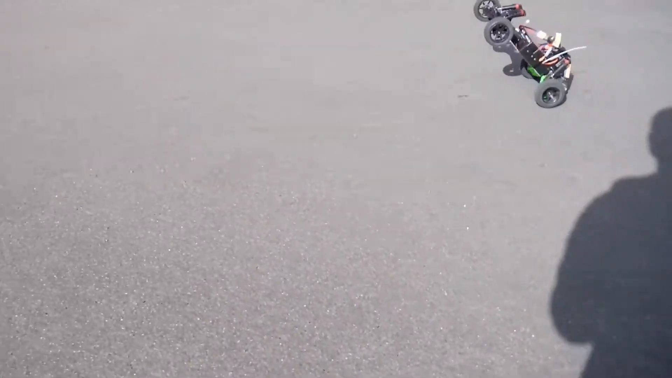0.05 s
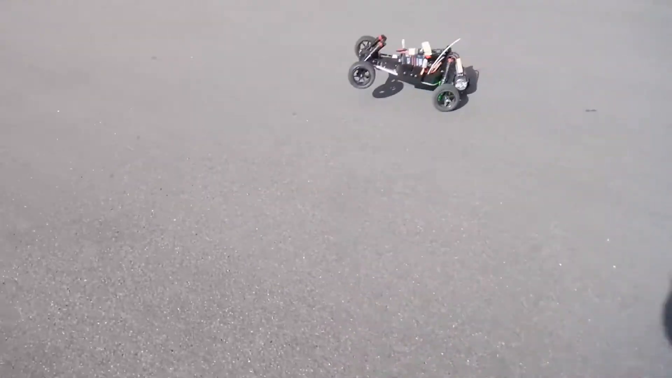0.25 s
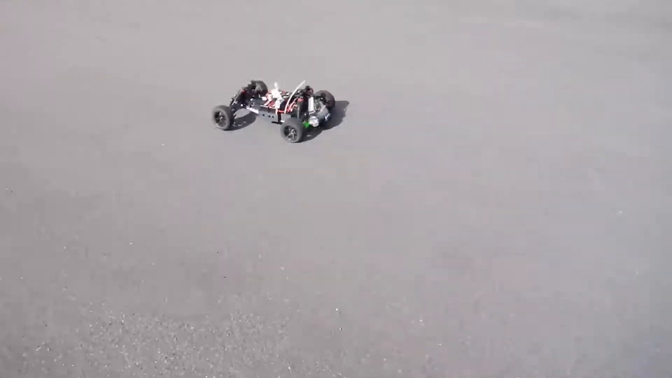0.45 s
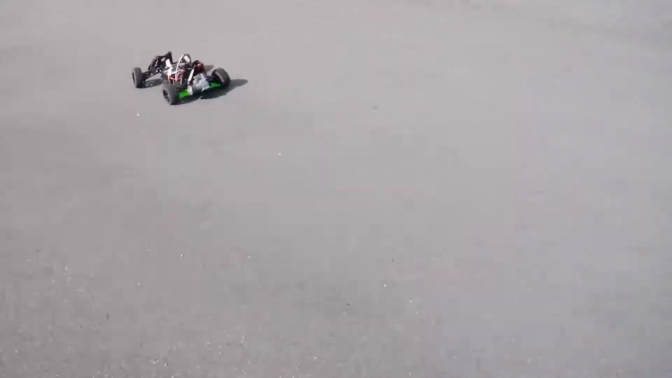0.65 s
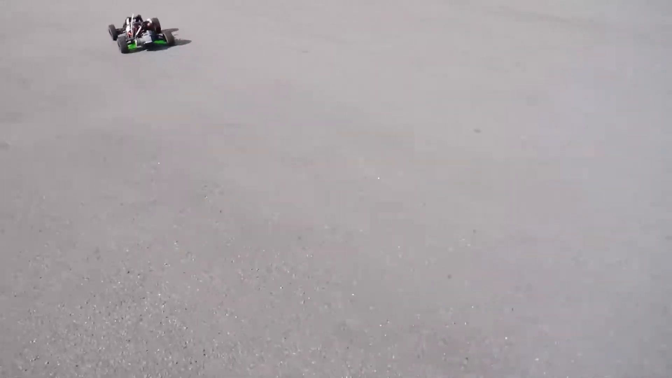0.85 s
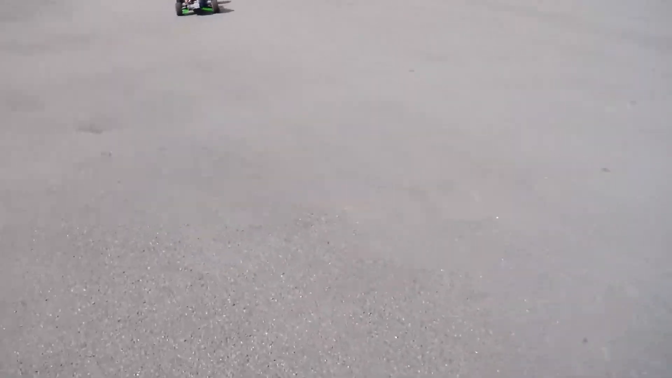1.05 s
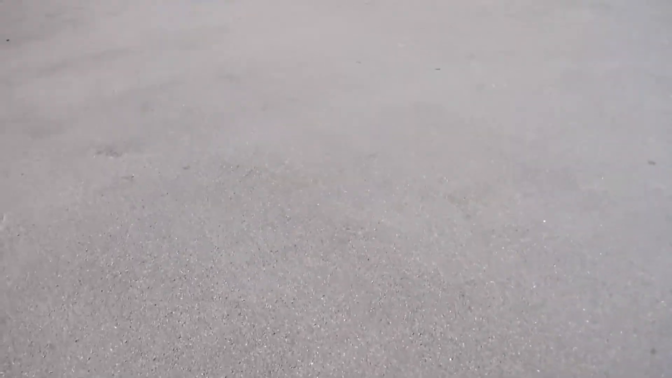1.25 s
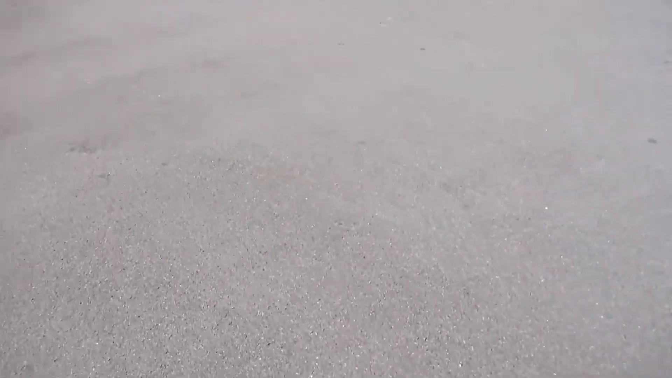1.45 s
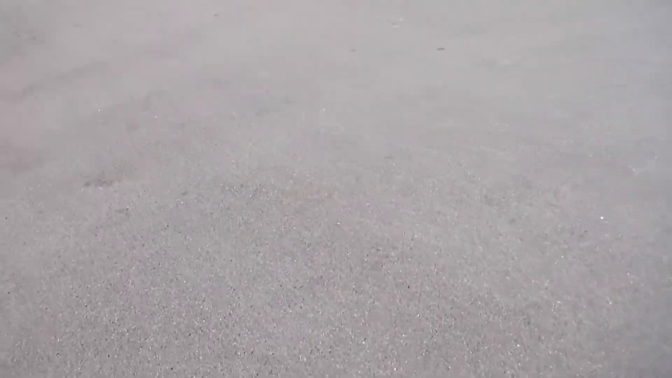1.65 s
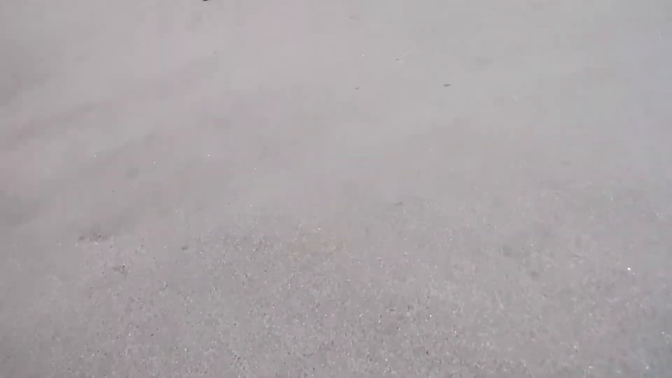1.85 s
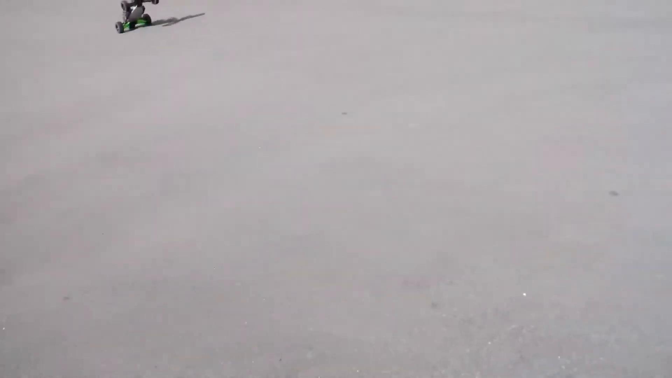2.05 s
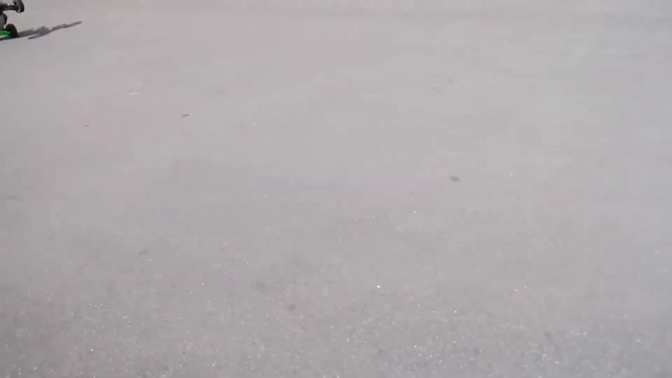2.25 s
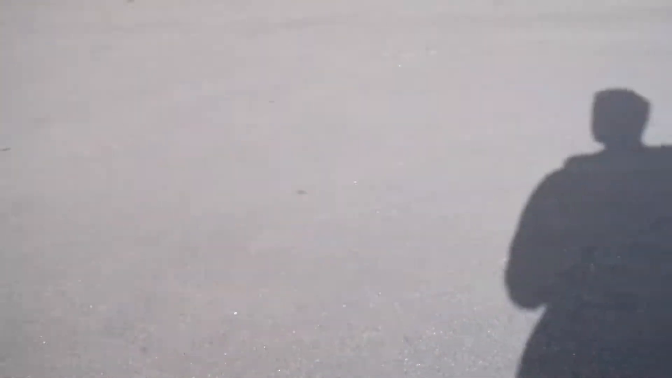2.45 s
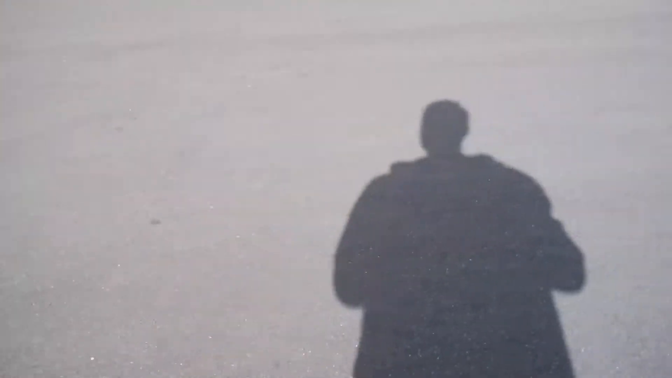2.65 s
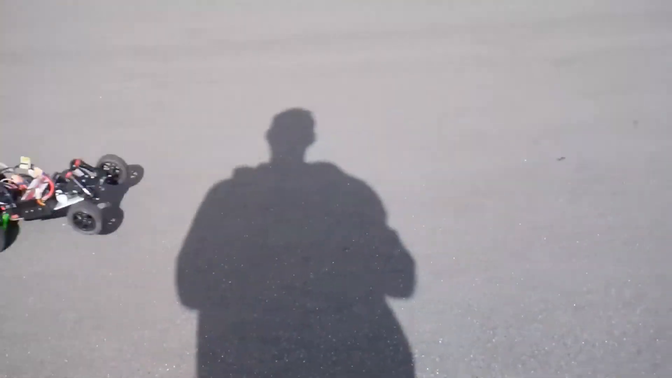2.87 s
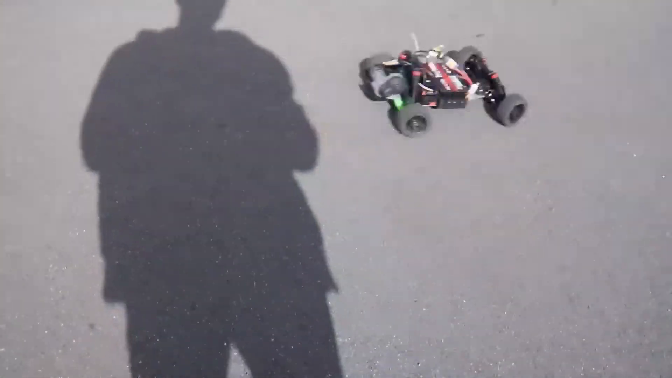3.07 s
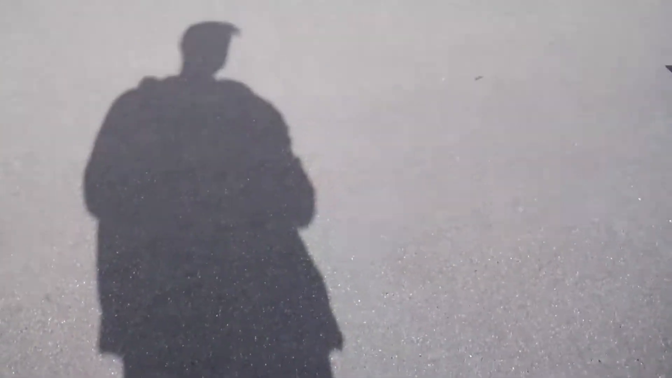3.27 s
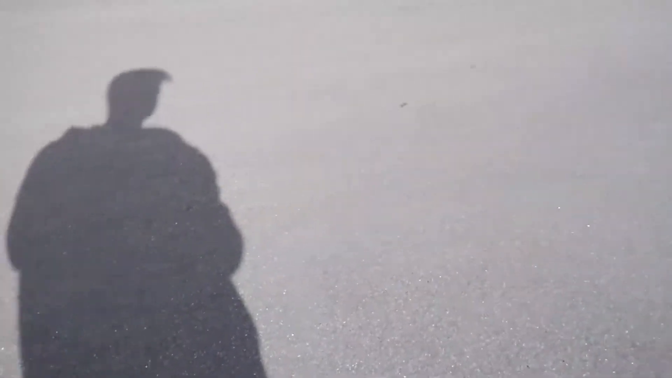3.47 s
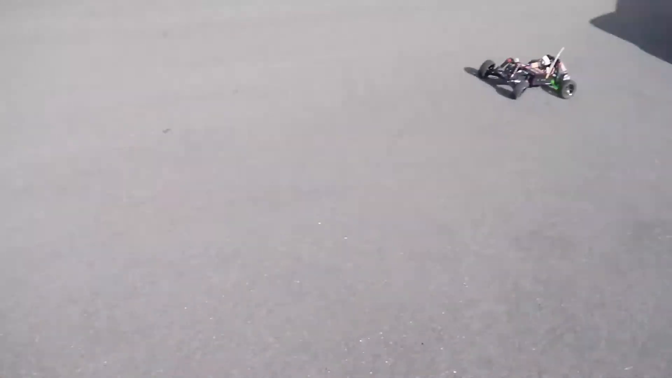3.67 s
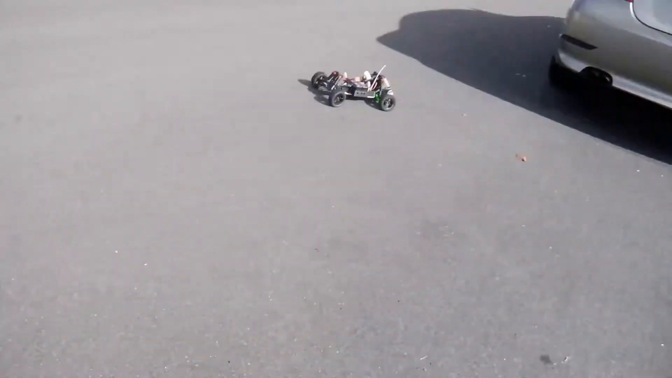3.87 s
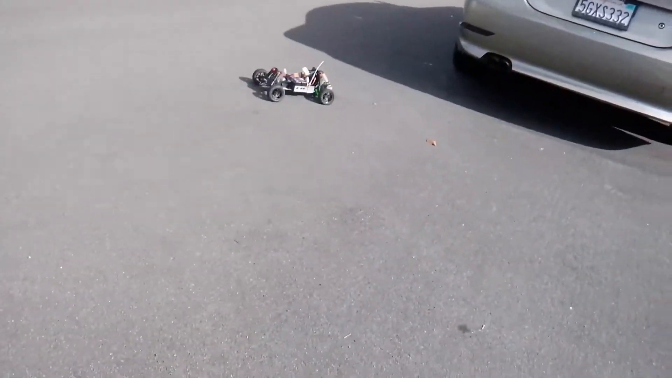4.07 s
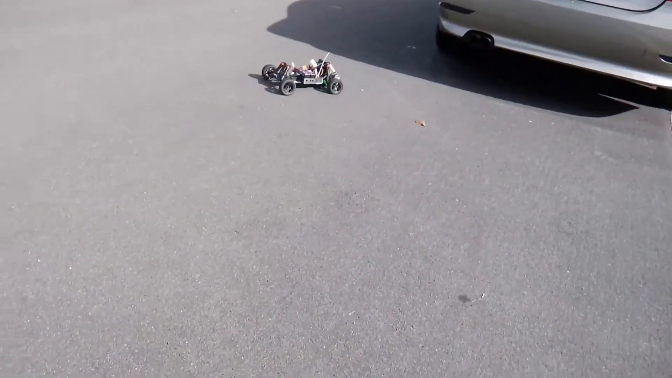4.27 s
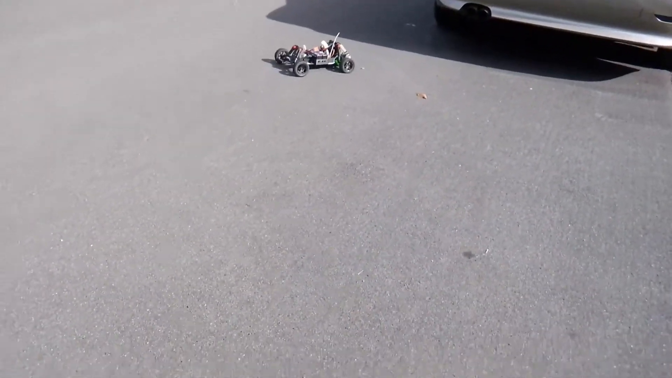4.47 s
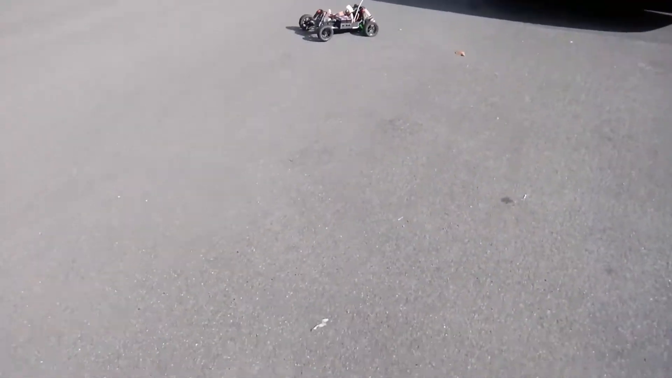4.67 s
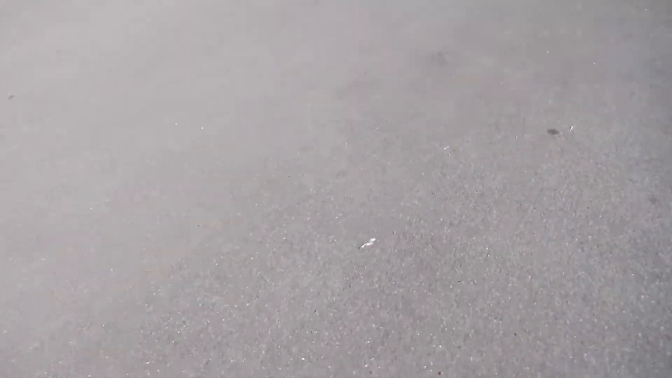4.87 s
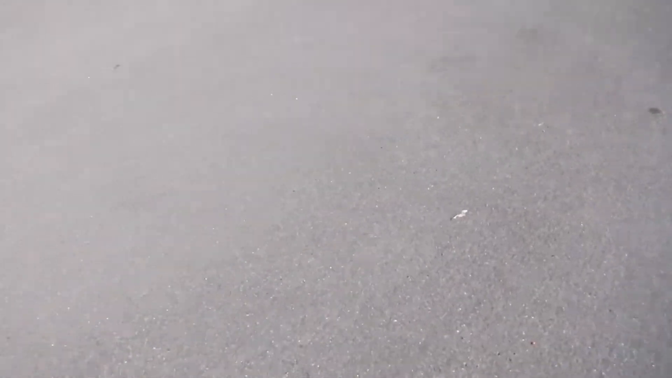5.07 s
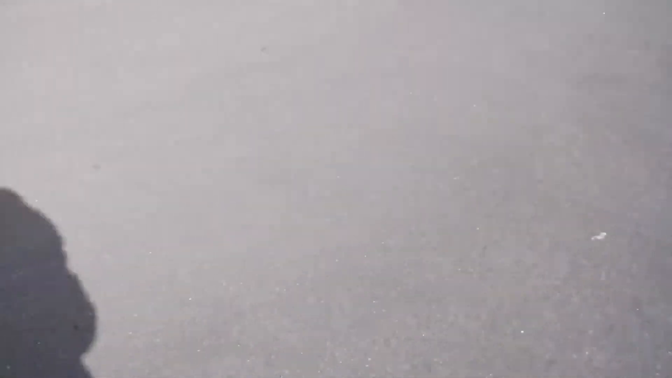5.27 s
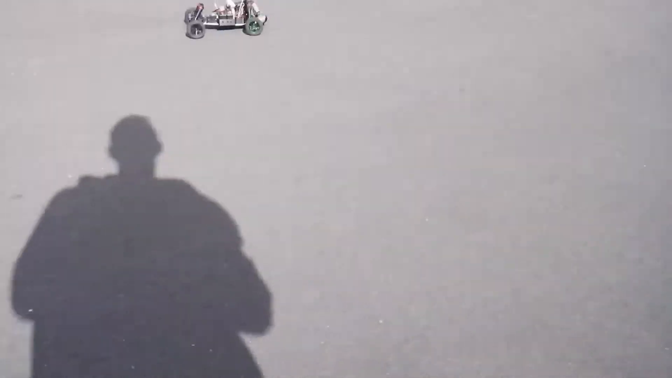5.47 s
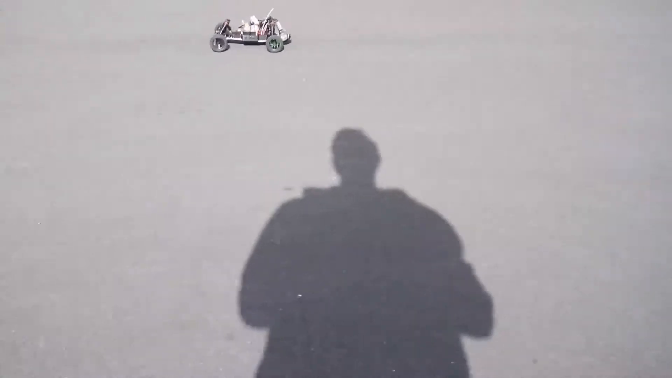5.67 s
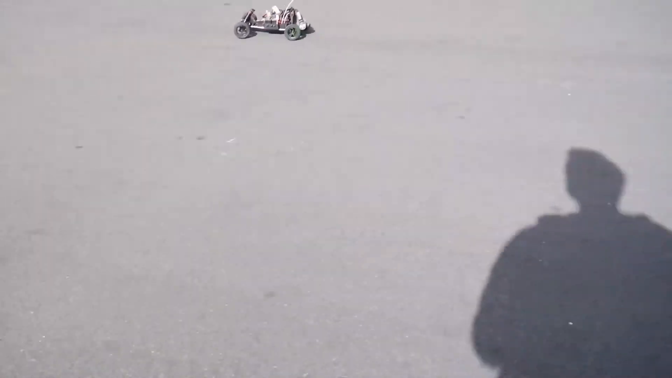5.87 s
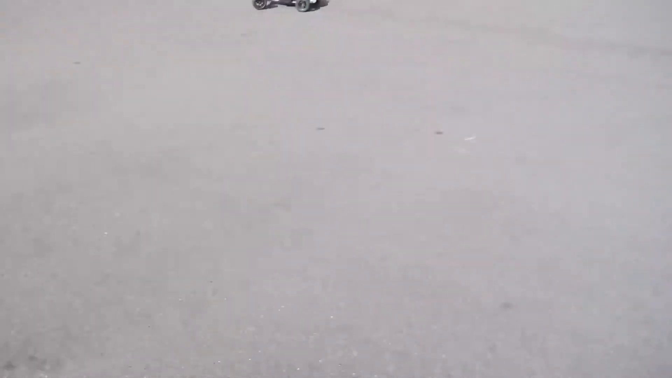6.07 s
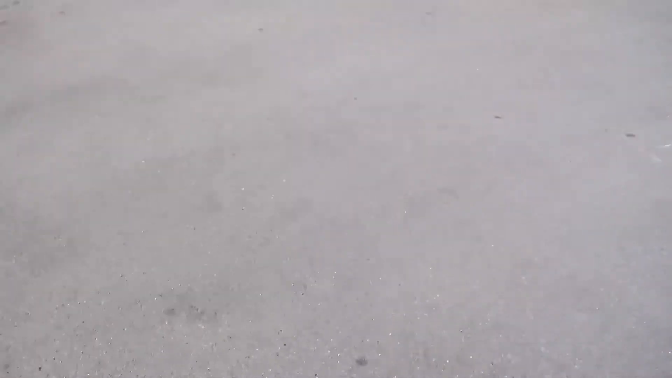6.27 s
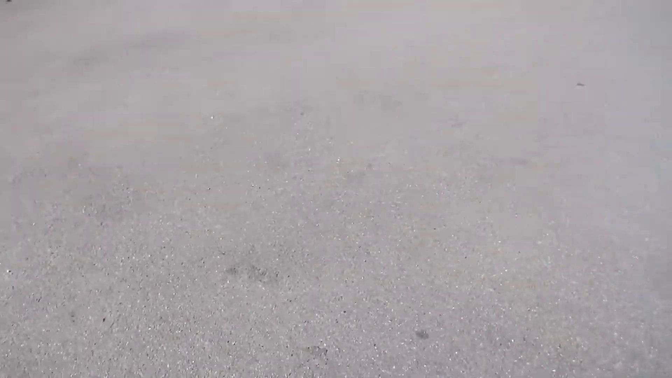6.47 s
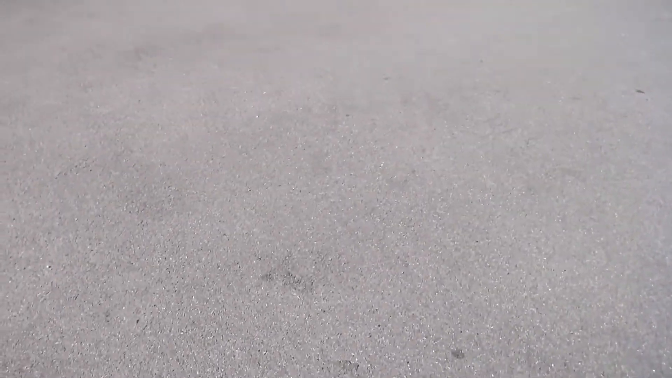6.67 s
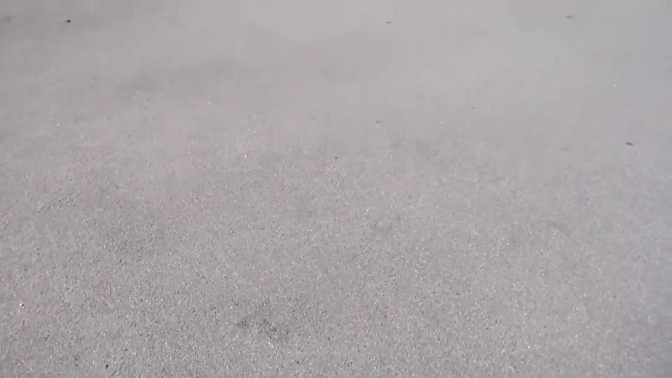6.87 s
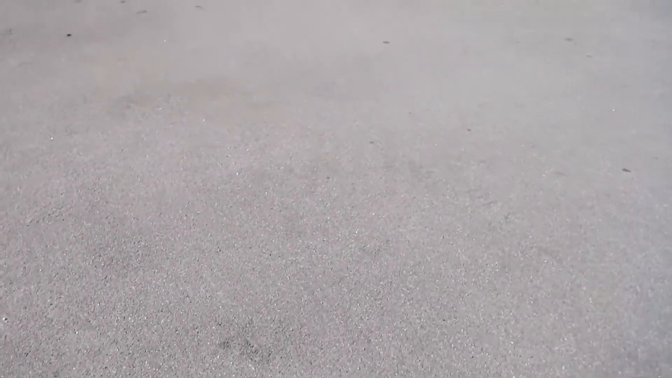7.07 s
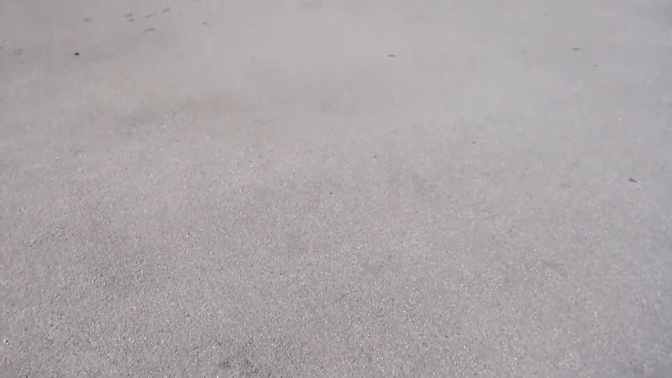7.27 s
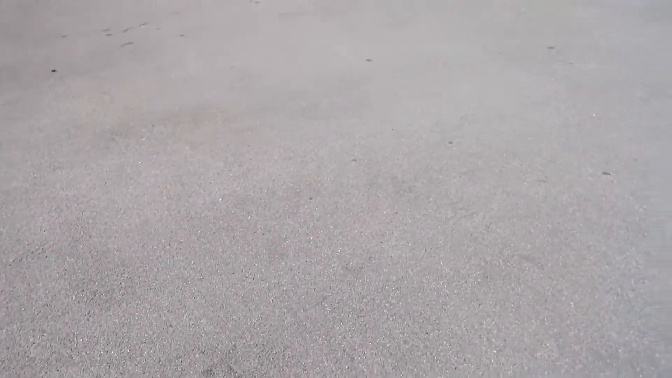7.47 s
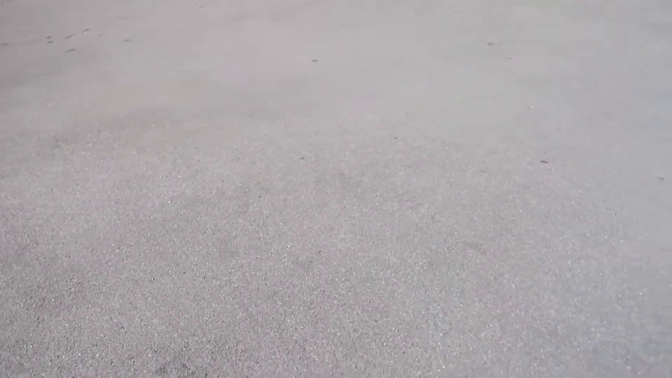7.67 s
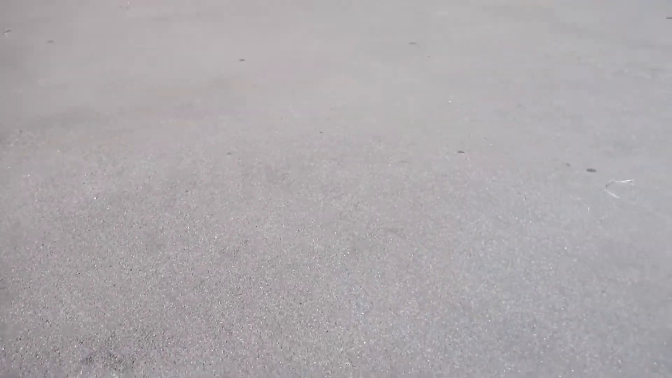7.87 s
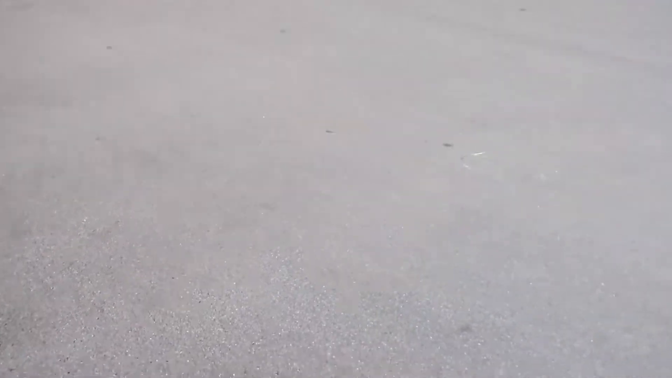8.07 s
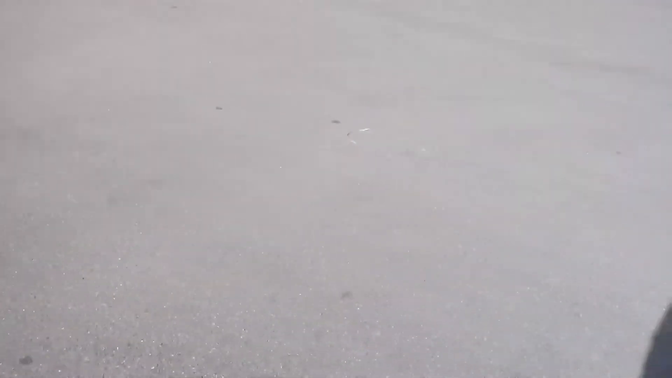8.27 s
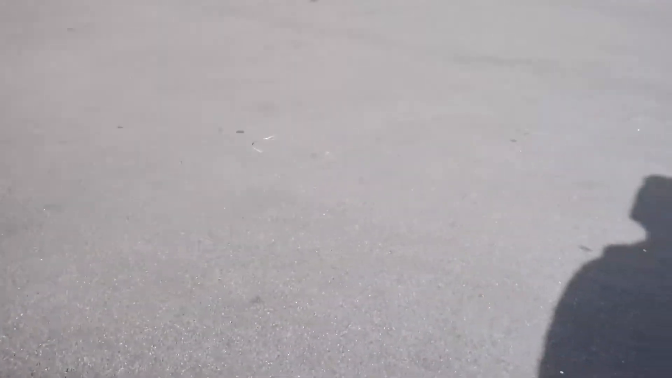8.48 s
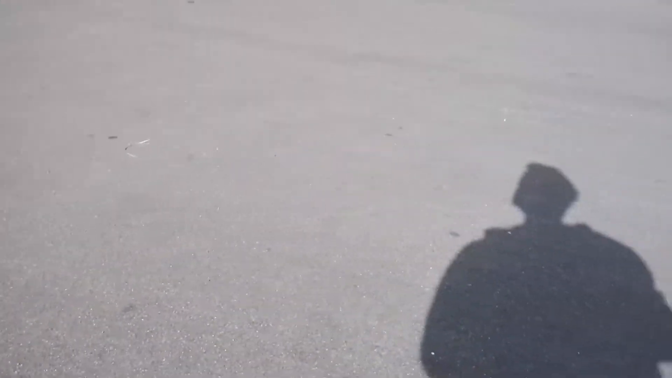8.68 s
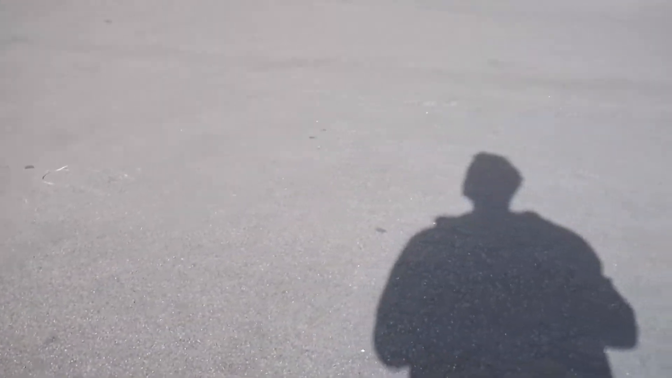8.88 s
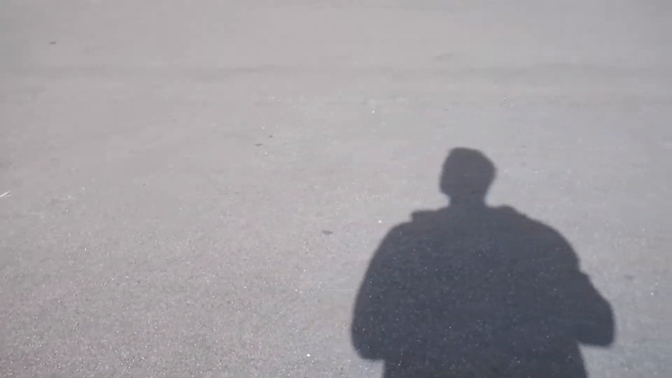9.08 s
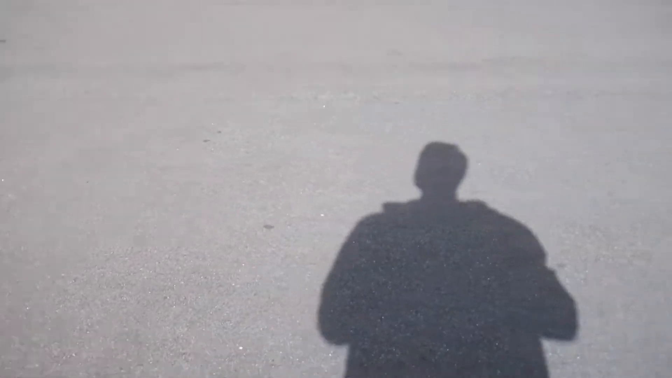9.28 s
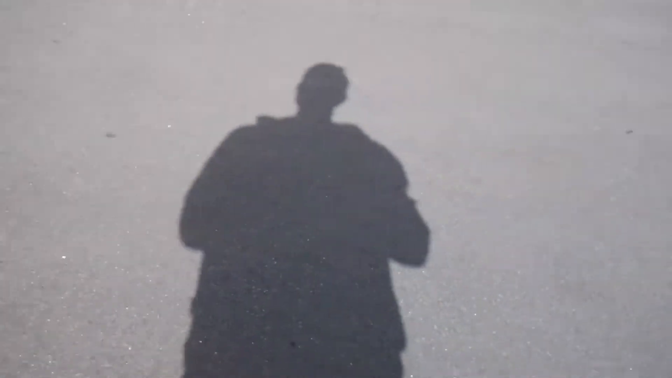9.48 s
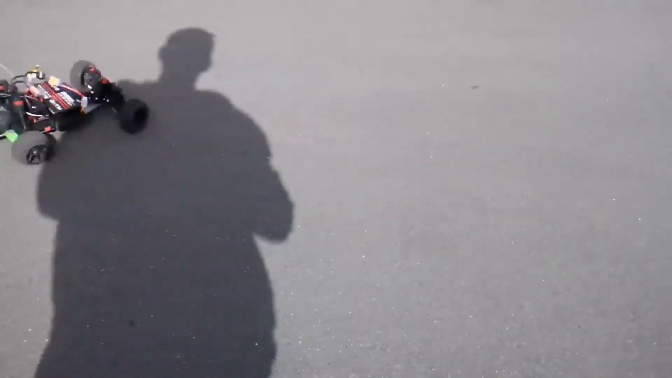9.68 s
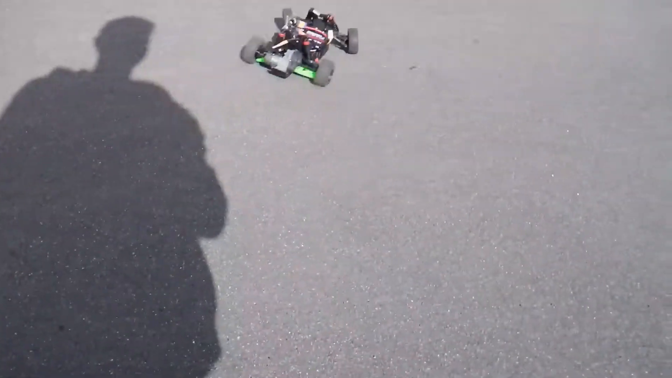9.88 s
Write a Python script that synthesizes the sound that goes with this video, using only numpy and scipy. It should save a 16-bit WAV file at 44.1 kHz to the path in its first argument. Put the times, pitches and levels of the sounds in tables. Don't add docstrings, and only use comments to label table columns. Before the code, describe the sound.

Thin, bright gear whine from a small model car swoops quickly up and down, with a buzzing plastic shell, gritty tyre scrub and sharp hops. Bursts are split by near-quiet gaps of faint hush and insects. The longest runs come mid-way and at the end, the last closing with a near slide and high wind-up. Low wind gusts bump the nearby handheld microphone, whose level dips after loud moments.

```python
import sys
import numpy as np
from scipy import signal
from scipy.fft import rfft, irfft
from scipy.io import wavfile

SR = 44100
rng = np.random.default_rng(int(sys.argv[2]) if len(sys.argv) > 2 else 0)


def makeup_ratio(level_db):
    decades = np.asarray(level_db, float) / 20
    return 10 ** decades


def waveform_to_disk(signal):
    frames = np.transpose(np.atleast_2d(signal))
    scaled = np.clip(frames, -1, 1) * 32767
    samples = np.round(scaled).astype(np.int16)
    wavfile.write(sys.argv[1], SR, samples)


N = 437913
TIME = np.arange(N) / SR

PINION, SPUR, TOP_GEAR = 17, 90, 22
LASH_HZ = 35
BITE_S = 0.0061
CLUTCH_DB_PER_S, IDLE_DB = 1496.5, -84.5
SHUDDER_DB_PER_S = 243
SHAKE_SHARE, DUCK_SHARE = 0.69, 0.5
GRIT_THROB, GRIT_SHARP = 0.45, 6
CONTROLLER_HZ, INSECTS_HZ = 8110, 10080
SPLIT_HZ = 2470, 4740
RING_RISE_S, RING_FALL_S = 0.0022, 0.0041
PATCH_DB_PER_S, SKID_DB_PER_S = (181, 134), (59, 63.5)
SPIN_DB_PER_S, GUST_DB_PER_S = (2502, 124), (240, 286)
DULL_DB = 3.5
HUSH_DB, RECOVER_DB_PER_S = -72.5, 11
TOP_HZ = 15750

# t/s, mesh f/Hz, load level/dB
BRAKE = [(0, 9390, -32), (.15, 9570, -25), (.205, 6850, -32), (.225, 5330, -21.5), (.24, 4050, -22.5),
         (.252, 3300, -28), (.274, 2856, -42.5), (.31, 2870, -34), (.335, 3200, -38.5)]
# t/s, mesh f/Hz, load level/dB
BLIP = [(0.361, 4940, -27), (0.389, 5350, -22.5), (0.418, 6170, -20.5), (0.468, 6590, -24.5),
        (.48, 5830, -26), (.495, 5250, -28), (.53, 4820, -38.5)]
# t/s, mesh f/Hz, load level/dB
ARC = [(0.551, 4890, -37), (.64, 6750, -26.5), (0.7, 7100, -28), (.76, 7300, -27.5), (.82, 6400, -31.5),
       (.85, 6000, -38)]
# t/s, mesh f/Hz, load level/dB
COAST = [(.86, 5700, -39), (.92, 5350, -31), (1.04, 5250, -36), (1.08, 4700, -44), (1.125, 5190, -31.5),
         (1.16, 4700, -46), (1.27, 3300, -43), (1.29, 3053, -25), (1.324, 1344, -29)]
# t/s, mesh f/Hz, load level/dB
SQUEAL = [(1.664, 1380, -27), (1.683, 1745, -26), (1.702, 2240, -27), (1.726, 3333, -25),
          (1.741, 4080, -27), (1.757, 4213, -26), (1.79, 3994, -40)]
# t/s, mesh f/Hz, load level/dB
GRIP = [(1.806, 3850, -24), (1.818, 3300, -23), (1.834, 3041, -26), (1.861, 3360, -26.5),
        (1.898, 3466, -21.5), (1.931, 3493, -29)]
# t/s, mesh f/Hz, load level/dB
SKIP = [(1.949, 5190, -23.5), (2.01, 6400, -26.5), (2.04, 6590, -38), (2.112, 7470, -30),
        (2.145, 6200, -25), (2.172, 5100, -18), (2.21, 4720, -18)]
# t/s, mesh f/Hz, load level/dB
SWERVE = [(2.23, 5300, -21.5), (2.26, 6300, -39), (2.31, 7165, -24), (2.358, 6700, -26),
          (2.399, 5810, -21.5), (2.449, 5950, -30)]
# t/s, mesh f/Hz, load level/dB
BOUNCE = [(2.469, 6300, -43.5), (2.498, 6870, -24.5), (2.568, 6200, -28), (2.631, 6500, -31),
          (2.675, 6200, -36.5), (2.728, 7170, -20.5), (2.769, 6130, -23), (2.82, 6780, -22.5),
          (2.951, 6450, -24.5)]
# t/s, mesh f/Hz, load level/dB
SLUMP = [(2.989, 4948, -17), (3.005, 3609, -14.5), (3.022, 2200, -22.5)]
# t/s, mesh f/Hz, load level/dB
REVERSE = [(3.414, 2200, -39), (3.44, 3390, -31), (3.465, 4140, -24), (3.489, 3224, -23),
           (3.524, 2590, -33), (3.551, 1712, -30), (3.61, 900, -42.5)]
# t/s, mesh f/Hz, load level/dB
LAUNCH = [(4.603, 1253, -32), (4.626, 1538, -25.5), (4.639, 2410, -20), (4.659, 2540, -20.5),
          (4.691, 2378, -24.5), (4.782, 2985, -22), (4.8, 3790, -26.5), (4.831, 4040, -23),
          (4.855, 3496, -22)]
# t/s, mesh f/Hz, load level/dB
SPRINT = [(4.862, 3690, -23.5), (4.95, 4010, -25), (5.2, 4780, -24), (5.261, 5020, -22.5),
          (5.298, 5636, -20), (5.5, 5850, -21.5), (5.528, 5960, -27.5)]
# t/s, mesh f/Hz, load level/dB
DASH = [(5.53, 6045, -20.5), (5.7, 6175, -24), (5.74, 6440, -22.5), (5.901, 6710, -26), (5.961, 7050, -26),
        (6.05, 8830, -15), (6.102, 9320, -17), (6.207, 9300, -14.5)]
# t/s, mesh f/Hz, load level/dB
SPURT = [(6.72, 1398, -33), (6.774, 3237, -22), (6.8, 3599, -28), (6.851, 3320, -25), (6.891, 3380, -23),
         (6.923, 1320, -32.5)]
# t/s, mesh f/Hz, load level/dB
RESTART = [(7.645, 1300, -38), (7.675, 2100, -24.5), (7.704, 3163, -17.5), (7.77, 2950, -24),
           (7.801, 3190, -22), (7.829, 3943, -27.5), (7.915, 4480, -26), (7.95, 3944, -25),
           (7.974, 3900, -29)]
# t/s, mesh f/Hz, load level/dB
LULL = [(7.99, 3414, -25), (8.03, 3402, -28.5), (8.085, 3390, -28.5), (8.11, 3830, -28)]
# t/s, mesh f/Hz, load level/dB
RETURN = [(8.13, 3974, -27), (8.2, 4050, -24.5), (8.28, 4325, -25), (8.5, 4476, -26.5), (8.75, 4876, -26),
          (8.9, 5150, -23.5), (9.279, 5330, -22.5), (9.349, 5755, -19.5)]
# t/s, mesh f/Hz, load level/dB
FINISH = [(9.372, 5780, -21.5), (9.5, 5680, -23.5), (9.7, 5583, -23.5), (9.725, 5650, -26.5),
          (9.748, 6220, -26), (9.781, 6950, -23), (9.828, 8275, -24.5), (9.866, 8883, -19.5),
          (9.93, 9100, -21)]
# t/s, length/s, from f/Hz, to f/Hz, load level/dB
TWITCHES = [(3.397, 0.0093, 3250, 4185, -30), (1.649, 0.01, 1600, 2690, -31),
            (6.972, 0.034, 1860, 2955, -36), (7.05, 0.047, 1935, 1518, -44),
            (7.161, 0.062, 1576, 2110, -50), (7.263, 0.019, 1730, 1830, -62),
            (7.309, 0.07, 1761, 1572, -50), (7.424, 0.025, 1700, 1904, -49),
            (7.473, 0.026, 1880, 1720, -56), (3.654, 0.03, 1692, 1970, -45),
            (3.713, 0.023, 1893, 2060, -49.5), (3.773, 0.043, 2020, 2050, -49)]
# mesh f/Hz, level/dB
WHINE = [(1200, -1.5), (3400, -4.5), (4100, -3.5), (4650, -7), (5200, -18.5), (6700, -2), (7400, -20),
         (9400, -35)]
# mesh f/Hz, level/dB
SECOND = [(1300, -16), (3200, -22.5), (4200, -21), (5500, -19.5), (6800, -14), (9400, -18.5)]
# f/Hz, level/dB
OVERTONE = [(2400, -15), (4200, -15), (5200, -15), (6800, -16), (7700, -35), (8800, -37), (10500, -30),
            (12000, -33), (13000, -48)]
# f/Hz, level/dB
OCTAVE = [(2000, 1), (2800, -5), (3300, -4), (3900, 2), (4250, -17)]
# f/Hz, level/dB
TWELFTH = [(2000, 1), (2600, 2), (3200, 7.5), (4000, -23), (4600, -16), (5500, -31), (7000, -30)]
# t/s, length/s, extra level/dB
STRAINS = [(.15, 0.051, 13.5), (.38, 0.073, 5), (.63, 0.2, 11), (2.1, 0.06, 2), (2.29, 0.11, 1.5),
           (5.0, .25, 1.5), (5.7, 0.26, 5.5), (6.04, 0.14, 8.5), (8.0, 0.098, -2), (4.85, 0.13, -1),
           (5.3, 0.28, -2)]
# t/s, length/s, extra level/dB
WINDUP = [
    (2.34, 0.066, 6),
    (5.75, 0.15, -3),
    (9.73, 0.16, 10),
]
# t/s, extra level/dB
BITES = [(0.302, 15.5), (.421, 0), (.449, 2), (.463, 3.5), (1.29, 10.5), (1.722, 9), (1.821, 13),
         (1.853, 9.5), (1.712, 6), (1.867, 13), (3.52, 5), (3.555, 4), (2.744, 6), (2.8, 7), (2.841, 8.5),
         (3.438, 10), (3.466, 2.5), (3.488, 5), (4.611, 9.5), (4.635, 2.5), (4.779, 8), (4.815, 0),
         (4.832, -1), (4.905, -1), (4.95, 11), (4.975, 0), (5.747, 4), (6.773, 6), (6.894, 4), (6.915, 8),
         (7.676, 1), (7.7, -8), (7.712, -0.5), (7.77, 0.5), (7.799, -1.5), (7.83, 8), (7.84, 3.5),
         (7.87, 5), (8.428, 9.5), (9.765, 9)]
# t/s, length/s, level/dB
CONTROLLER = [
    (.33, .45, -55),
    (2.45, 0.79, -62),
    (5.4, 0.6, -84),
    (7.8, 0.98, -68),
    (9.0, 0.55, -66),
    (9.6, .22, -58),
]
# t/s, distance/m
DISTANCE = [(0, 1.26), (1.15, 0.97), (1.45, 5.8), (2.2, 4.53), (3.2, 2.1), (4.7, 3.3), (5.7, 2.69),
            (6.55, 3.55), (6.8, 3.65), (8.0, 1.775), (9.2, 7.6), (9.6, 1.6)]
# mesh f/Hz, level/dB
GRIT = [(1300, -36), (3400, -13), (4500, -8), (6200, -2), (7200, 0), (9400, -9.5)]
# f/Hz, level/dB per Hz
CHASSIS = [(600, -31.5), (1000, -21.5), (1360, -2.5), (1620, 3.5), (1850, 1), (2750, -9.5), (3210, 1),
           (3650, -6), (4490, -15.5), (5690, -13), (6500, -8), (7500, -23.5), (8600, -33), (15700, -69.5)]
# f/Hz, width/Hz, level/dB over rattle
PANELS = [
    (777, 170, -18.5),
    (1600, 230, -22),
    (3220, 330, -19.5),
    (4050, 140, -23.5),
]
# t/s, peak level/dB, f/Hz
RINGS = [(.632, -15, 3220), (1.777, -12.5, 3260), (2.065, -24, 1480), (2.984, -22, 2800), (3.82, -34, 3080),
         (3.99, -28, 3010), (4.105, -35, 3132), (5.02, -38, 3146), (5.063, -27, 3270), (5.085, -17, 3222),
         (6.308, -13.5, 3260), (6.66, -21, 996), (7.216, -29, 2688), (6.209, -14, 316.5),
         (6.257, -19, 300.6), (7.311, -21, 454), (7.677, -19, 4090), (7.274, -44, 2710), (7.445, -36, 2810),
         (7.335, -28, 2587), (7.628, -33, 4048), (8.152, -20.5, 2749)]
# t/s, length/s, level/dB
PATCHES = [(.44, 0.017, -52), (.9, 0.47, -22.5), (2.0, 0.4, -24.5), (3.04, 0.57, -25.5), (3.7, 0.61, -36),
           (5.56, 0.023, -44.5), (6.08, 0.036, -20.5), (6.2, 0.34, -26.5), (7.05, 0.031, -43),
           (7.3, 0.054, -36), (7.45, 0.03, -49), (9.85, 0.079, -26)]
# f/Hz, level/dB per Hz
TYRES = [(88, -20.5), (150, -43), (242, -12.5), (461, -8.5), (558, -6.5), (760, 1.5), (1100, -2.5),
         (1270, -8), (2600, -24.5), (3380, -66), (5720, -120)]
# t/s, length/s, level/dB
SKIDS = [(.17, 0.026, -35.5), (.43, 0.0084, -32.5), (.66, 0.15, -28.5), (1.25, 0.26, -24),
         (2.3, 0.11, -34.5), (3.04, 0.094, -21), (3.25, 0.17, -18), (5.5, 0.41, -36.5), (6.05, 0.16, -20),
         (6.6, 0.041, -22.5), (9.55, 0.18, -17.5), (9.85, .1, -26)]
# t/s, length/s, level/dB
TREAD = [
    (1.365, 0.14, -30),
    (3.16, 0.242, -21.5),
    (6.0, 0.26, -36),
    (9.55, 0.208, -21),
    (9.3, 0.18, -33.5),
]
# t/s, length/s, level/dB
SPINS = [
    (0, 0.16, -22.5),
    (1.7, 0.098, -28.5),
    (4.5, 0.11, -30),
    (6.5, 0.075, -24.5),
    (3, 0.055, -26),
    (2.11, 0.073, -28),
    (7, 0.042, -38),
]
# t/s, peak level/dB, bright share level/dB
HOPS = [(0.2962, -42, -49), (1.8152, -45, -47), (1.951, -20.5, -39), (2.2534, -12, -48.5),
        (2.308, -12.5, -39), (2.4053, -13, -27), (2.45, -12, -41), (2.492, -13, -25), (2.534, -12.5, -19),
        (2.5877, -22.5, -29), (2.6418, -12.5, -20), (2.654, -17, -35), (2.952, -22, -28),
        (2.9947, -31, -51), (3.8001, -34, -32.5), (3.9807, -24, -35), (3.995, -25, -40), (4.008, -28, -38),
        (4.2589, -36, -34), (5.9749, -13, -35), (6.2436, -12, -30), (6.3052, -20.5, -64), (6.655, -20, -41),
        (6.7696, -19.5, -38), (7.0545, -35.5, -37), (7.101, -47, -28.5), (7.211, -29, -35),
        (7.273, -36, -34), (7.3042, -26.5, -39), (7.333, -31, -36), (7.44, -31.5, -42),
        (7.625, -24.5, -36.5)]
# f/Hz, level/dB per Hz
WIND = [(15, -28), (40, -1.5), (91, 3.5), (135, 3.5), (180, 0.5), (250, -3), (385, -11), (600, -22),
        (900, -75.5)]
# t/s, length/s, level/dB
GUSTS = [(.39, 0.042, -25.5), (.66, 0.065, -31.5), (.72, 0.023, -25.5), (.97, 0.026, -31.5),
         (1.06, 0.024, -37), (1.335, 0.019, -35), (1.67, 0.0088, -26), (1.8, 0.0047, -32.5),
         (2.95, 0.025, -28), (3.28, 0.029, -39), (5.0, 0.049, -30), (5.49, 0.21, -17), (6.01, 0.023, -19.5),
         (6.22, 0.037, -34), (6.68, 0.027, -49), (7.02, 0.046, -38), (7.3, 0.02, -40.5), (7.54, 0.012, -60),
         (7.7, 0.0092, -33), (7.82, 0.016, -32.5), (8.03, 0.015, -30), (8.58, 0.023, -22),
         (8.76, 0.043, -22), (9.07, 0.357, -21), (9.73, 0.013, -33)]
# t/s, level/dB
BREEZE = [(0, -35), (1.4, -39.5), (2.2, -45.5), (2.7, -56), (3.9, -43.5), (4.5, -49.5), (5.3, -41),
          (6.5, -51.5), (8.3, -42), (9.0, -29), (9.6, -32.5)]
# t/s, peak level/dB, f/Hz, slap share level/dB
THUMPS = [(0.379, -24, 127, -23), (0.665, -18, 111, -25), (1.074, -23, 123, -12), (1.67, -22, 124.4, -31),
          (2.952, -32, 125, 1), (5.0, -26.5, 109.7, -28), (5.457, -13, 203.2, -37),
          (5.483, -11, 149, -25.5), (5.626, -12, 101, -26), (5.689, -19, 129, -34),
          (6.201, -34, 320.6, -22), (6.25, -29, 284, -18), (7.029, -25, 111.9, -30),
          (7.128, -24.5, 97.5, -44), (7.21, -25, 91, -40), (7.305, -20.5, 158.1, -24),
          (7.538, -24, 90, -38), (7.695, -19, 92, -27), (7.825, -22.5, 78.34, -20.5),
          (8.047, -20.5, 112, -43), (8.808, -20.5, 149.1, -42), (9.093, -16, 293, -34),
          (9.42, -18, 130.1, -24)]
# f/Hz, level/dB per Hz
STREET = [(120, -53.5), (220, -11.5), (1070, -30.5), (3070, -24.5), (7000, -41.5), (8300, -43.5),
          (11000, -41.5), (15750, -50)]
# t/s, depth level/dB
DUCKS = [
    (.08, 4),
    (0.471, 9.5),
    (1.76, 5),
    (2.659, 10),
    (2.999, 2),
    (4.79, 3),
    (6.315, 9.5),
    (7.72, 4),
    (9.859, -8.5),
]
TRAPS_HZ = [1784, 3429, 3569, 3641, 4285, 4500]


def rms_one(x):
    return x / np.sqrt(np.mean(x ** 2) + 1e-20)


def in_time(rows):
    s, *columns = np.transpose(rows)
    return [np.interp(TIME, s, c) for c in columns]


def at_hz(points, hz):
    table_hz, db = np.transpose(points)
    return np.interp(np.log(hz), np.log(table_hz), db)


def power_sum(*levels_db):
    return 10 * np.log10(sum(makeup_ratio(2 * db) for db in levels_db))


def spells(rows, rise, fall):
    levels = []
    for s, length, db in rows:
        early = np.clip(s - TIME, 0, 1)
        late = np.clip(TIME - s - length, 0, 1)
        levels.append(db - rise * early - fall * late)
    return power_sum(*levels)


def drift(rate):
    r = np.exp(-16 * np.pi * rate / SR)
    noise = rng.standard_normal(N // 8 + 4002)
    slow = rms_one(signal.lfilter([1], [1, -2 * r, r * r], noise)[4000:])
    return np.interp(np.arange(N) / 8, np.arange(len(slow)), slow)


def colour(x, spectrum):
    log_gain = at_hz(spectrum, np.linspace(1, SR / 2, 2049)) * np.log(10) / 20
    cepstrum = irfft(log_gain)
    cepstrum[1:2048] *= 2
    cepstrum[2049:] = 0
    return signal.fftconvolve(x, irfft(np.exp(rfft(cepstrum))))[:N]


def butter(x, hz, kind, order=4):
    return signal.sosfilt(signal.butter(order, hz, kind, fs=SR, output="sos"), x)


def grains(spread_db):
    size_db = spread_db * np.minimum(rng.exponential(1, N), 6)
    return rng.standard_normal(N) * makeup_ratio(size_db)


def throttle():
    bursts = [BRAKE, BLIP, ARC, COAST, SQUEAL, GRIP, SKIP, SWERVE, BOUNCE, SLUMP, REVERSE, LAUNCH,
              SPRINT, DASH, SPURT, RESTART, LULL, RETURN, FINISH]
    bursts = bursts + [[(s, start, db), (s + length, end, db)] for s, length, start, end, db in TWITCHES]
    hz = in_time(sorted(row for burst in bursts for row in burst))[0]
    load_db = np.full(N, float(IDLE_DB))
    for burst in bursts:
        outside = np.maximum(burst[0][0] - TIME, 0) + np.maximum(TIME - burst[-1][0], 0)
        burst_hz, burst_db = in_time(sorted(burst))
        burst_db = burst_db - CLUTCH_DB_PER_S * outside
        hz = np.where(burst_db > load_db, burst_hz, hz)
        load_db = np.maximum(load_db, burst_db)
    return hz, load_db


def gear_motion(hz, load_db, dull_db):
    mesh = makeup_ratio(load_db + at_hz(WHINE, hz) - dull_db * hz / 6000)
    stage = makeup_ratio(load_db + at_hz(SECOND, hz) + power_sum(spells(STRAINS, 230, 300), 0))
    shudder = (0.0025 * hz + LASH_HZ) * drift(54.7)
    return hz + shudder, mesh, stage


def spur_throb(teeth, depth, sharp):
    bite = (0.5 + 0.5 * np.cos(2 * np.pi * teeth / SPUR)) ** sharp
    return (1 - depth + depth * bite * makeup_ratio(1.2 * drift(40))) / (1 - 0.45 * depth)


def mesh_throb(hz, teeth, lash):
    depth = np.interp(hz, [3000, 4800, 5250, 6500, 9000], [0.45, 0.6, 0.97, 0.75, 0.35])
    throb = spur_throb(teeth, depth, sharp=1.8)
    throb = throb * (1 + 0.13 * np.cos(2 * np.pi * teeth / PINION))
    bite_db = sum(db * np.exp(-0.5 * ((TIME - s) / BITE_S) ** 2) for s, db in BITES)
    slowness = np.clip((4200 - hz) / 1500, 0, 1)
    return throb * makeup_ratio(bite_db) * makeup_ratio(2.5 * slowness * lash)


def motor_cogging():
    crawl = [(s, length, db) for s, length, _, _, db in TWITCHES[3:]]
    return makeup_ratio(spells(crawl, CLUTCH_DB_PER_S, CLUTCH_DB_PER_S) + 4.18 * drift(65))


def gears(hz, teeth, mesh, stage):
    lash = drift(45)
    throb = mesh_throb(hz, teeth, lash)
    flutter = 0.7 * np.sin(2 * np.pi * teeth / SPUR)
    ratio = TOP_GEAR / SPUR
    stage = stage * makeup_ratio(1.1 * lash)
    octave_db = at_hz(OVERTONE, 2 * hz) + 2.5 * drift(40)
    octave = mesh * np.sqrt(throb) * makeup_ratio(octave_db) * (2 * hz < TOP_HZ)
    lines = [(1, mesh * throb), (2, octave), (ratio, stage)]
    windup_db = power_sum(spells(WINDUP, 250, 300), 0)
    for k, tint, lift_db in [(2, OCTAVE, windup_db), (3, TWELFTH, 0)]:
        partial_db = at_hz(tint, k * ratio * hz) + 2.7 * drift(40) + lift_db
        lines.append((k * ratio, stage * makeup_ratio(partial_db)))
    cogging = motor_cogging()
    lines += [(0.5, cogging * makeup_ratio(-8)), (1.5, cogging)]
    out = 0
    for order, level in lines:
        smear = 1 + (order * hz / 8500) ** 4 * (order == 1) + (order == 2)
        blur = (0.45 + 0.15 * order) * butter(drift(160), 450, "low", order=2) * smear
        uneven = 1 + 0.3 * butter(drift(200), 500, "low", order=2)
        phase = 2 * np.pi * order * teeth + blur + flutter * (order == 1)
        out = out + level * uneven * np.sin(phase)
    return np.sqrt(2) * out


def controller_whistle():
    level_db = spells(CONTROLLER, 200, 200) + 1.5 * drift(30)
    return makeup_ratio(level_db) * np.sin(2 * np.pi * CONTROLLER_HZ * TIME + 1.5 * drift(25))


def rolling(hz, load_db, dull_db):
    held = np.maximum.accumulate(load_db + SHUDDER_DB_PER_S * TIME) - SHUDDER_DB_PER_S * TIME
    shake = -29 + SHAKE_SHARE * (held + 28)
    patch = spells(PATCHES, *PATCH_DB_PER_S)
    skid = spells(SKIDS, *SKID_DB_PER_S)
    spin = spells(SPINS, *SPIN_DB_PER_S)
    rattle = power_sum(shake, patch - 9, skid - 9, spin - 3, -59) - 0.29 * dull_db
    drum = power_sum(shake - 8, patch, skid - 12, spin + 1.5, -47)
    scrub = power_sum(shake - 12, skid, patch - 18, spin - 12, -51.0)
    grit = power_sum(shake + at_hz(GRIT, hz), skid - 8, patch - 16, spin - 4 + dull_db, -79) - dull_db
    return rattle, drum, scrub, grit


def panels(rattle_db):
    out = np.zeros(N)
    for hz, width, db in PANELS:
        band = butter(rng.standard_normal(N), [hz - width / 2, hz + width / 2], "band", order=2)
        out += makeup_ratio(rattle_db + db + 4.24 * drift(34)) * rms_one(band)
    for s, db, hz in RINGS:
        envelope = np.exp(np.minimum((TIME - s) / RING_RISE_S, (s - TIME) / RING_FALL_S))
        out += makeup_ratio(db) * envelope * np.sin(2 * np.pi * hz * TIME)
    return out


def chassis(teeth, rattle_db, drum_db, grit_db):
    shake = colour(grains(2.8) * makeup_ratio(1.64 * drift(53)), CHASSIS)
    drum = makeup_ratio(drum_db - 13.0 + 4.0 * drift(30)) * rms_one(butter(shake, min(SPLIT_HZ), "low"))
    rattle = makeup_ratio(rattle_db - 6.5 + 0.7 * drift(30)) * rms_one(butter(shake, SPLIT_HZ, "band"))
    bright = rms_one(butter(shake, max(SPLIT_HZ), "high"))
    grit = makeup_ratio(grit_db - 9.0) * spur_throb(teeth, GRIT_THROB, GRIT_SHARP) * bright
    return drum + rattle + grit + panels(rattle_db)


def tyres(scrub_db):
    rub = grains(3.38)
    uneven_db = 1.67 * drift(26.0)
    scrub = makeup_ratio(scrub_db - 4.5 + uneven_db) * rms_one(colour(rub, TYRES))
    buzz = rms_one(butter(rub, [870, 1200], "band", order=2))
    return scrub + makeup_ratio(spells(TREAD, 100, 160) + uneven_db) * buzz


def wheelspin():
    roar = rms_one(butter(grains(1.6), [1300, 7000], "band"))
    return makeup_ratio(spells(SPINS, *SPIN_DB_PER_S) - 19.0) * roar


def hops():
    knock, tick = np.zeros(N), np.zeros(N)
    after = np.arange(1500) / SR
    for s, db, bright_db in HOPS:
        burst = rng.standard_normal(1500)
        at = round(s * SR)
        knock[at:at + 1500] += makeup_ratio(db + 5.0) * burst * np.exp(-after / 0.0062)
        tick[at:at + 1500] += makeup_ratio(db + bright_db - 3.0) * burst * np.exp(-after / 0.001)
    return butter(colour(knock, CHASSIS), 6600, "low", order=2) + butter(tick, 6200, "high", order=2)


def wind(wind_db):
    eddies = rng.standard_normal(N) * makeup_ratio(5.1 * drift(18.8))
    out = makeup_ratio(wind_db - 1.5) * rms_one(colour(eddies, WIND))
    after = np.arange(3000) / SR
    for s, db, hz, slap_db in THUMPS:
        at = round(s * SR)
        puff = butter(rng.standard_normal(3000), [300, 1100], "band", order=2)
        slap = makeup_ratio(slap_db + 23.5) * puff * np.exp(-after / 0.012)
        thump = 2.25 * np.sin(2 * np.pi * hz * after) * np.exp(-after / 0.005)
        out[at:at + 3000] += makeup_ratio(db) * (thump + slap)
    return butter(out, 38, "high", order=2)


def ducking():
    gains_db = []
    for s, depth in DUCKS:
        recovery = np.minimum(RECOVER_DB_PER_S * (TIME - s) - depth, 0)
        gains_db.append(np.where(TIME < s, 0, recovery))
    return np.min(gains_db, axis=0)


def street():
    hush = colour(rng.standard_normal(N), STREET)
    hush = hush / np.std(butter(hush, 12800, "high"))
    band = [INSECTS_HZ * 0.993, INSECTS_HZ * 1.007]
    insects = rms_one(butter(rng.standard_normal(N), band, "band", order=2))
    return makeup_ratio(HUSH_DB + ducking()) * (hush + makeup_ratio(2 * drift(18)) * insects)


def distant_traffic():
    return makeup_ratio(-58.5) * rms_one(butter(rng.standard_normal(N), [22, 70], "band", order=2))


def scene():
    hz, load_db = throttle()
    distance = np.maximum(in_time(DISTANCE)[0], 0.5)
    dull_db = DULL_DB * np.log2(distance / 2)
    rattle_db, drum_db, scrub_db, grit_db = rolling(hz, load_db, dull_db)
    hz, mesh, stage = gear_motion(hz, load_db, dull_db)
    teeth = np.cumsum(hz) / SR
    car = gears(hz, teeth, mesh, stage) + controller_whistle()
    car = car + chassis(teeth, rattle_db, drum_db, grit_db)
    car = car + tyres(scrub_db) + wheelspin() + hops()
    wind_db = power_sum(spells(GUSTS, *GUST_DB_PER_S), in_time(BREEZE)[0])
    mix = makeup_ratio(DUCK_SHARE * ducking()) * car + wind(wind_db) + street() + distant_traffic()
    return mix[None]


def top_cut(x):
    return signal.sosfilt(signal.butter(12, 15750, fs=SR, output="sos"), x)


def record(dry):
    for hz in TRAPS_HZ:
        dry = signal.lfilter(*signal.iirnotch(hz, hz / 45, SR), dry)
    low_pass = signal.cheby2(12, 70, 1.12 * TOP_HZ, fs=SR, output="sos")
    mix = signal.sosfilt(low_pass, dry)
    return top_cut(mix)


dry = scene()
out = record(dry)
waveform_to_disk(out)
```